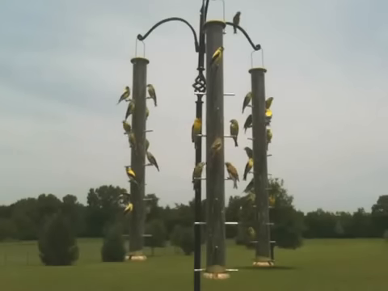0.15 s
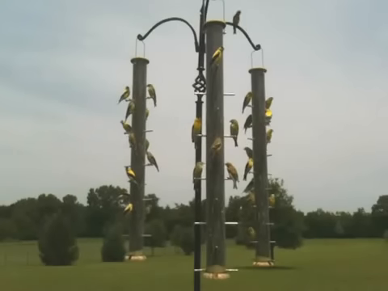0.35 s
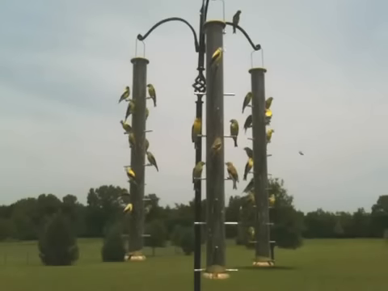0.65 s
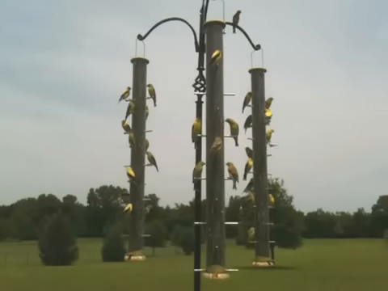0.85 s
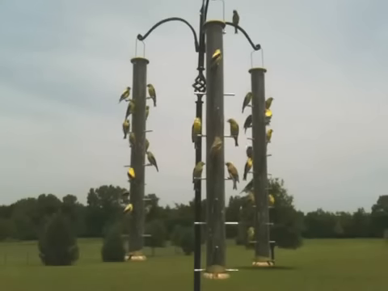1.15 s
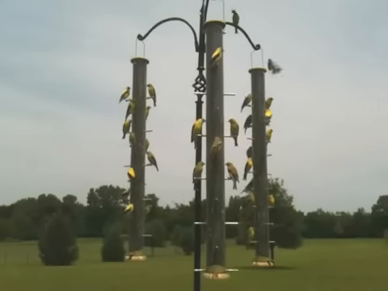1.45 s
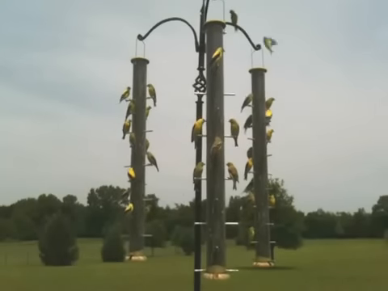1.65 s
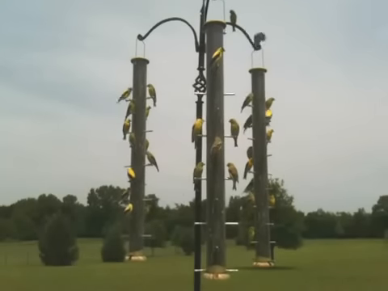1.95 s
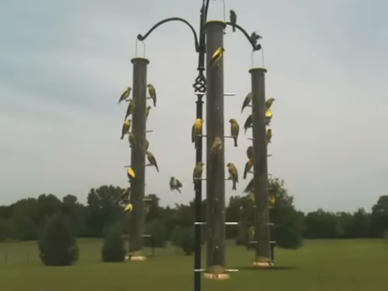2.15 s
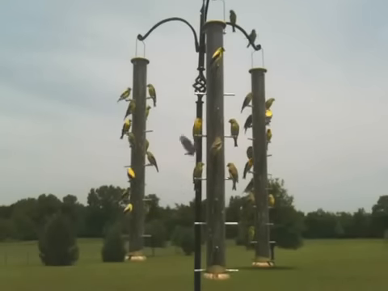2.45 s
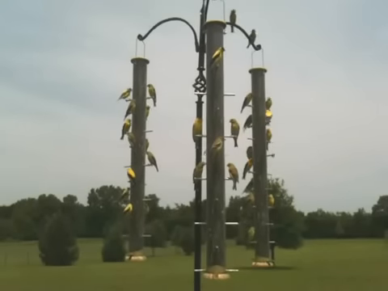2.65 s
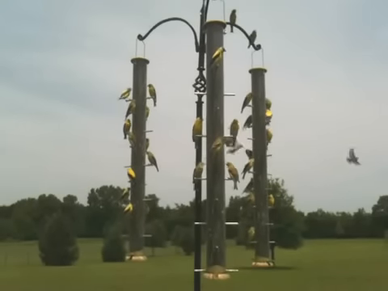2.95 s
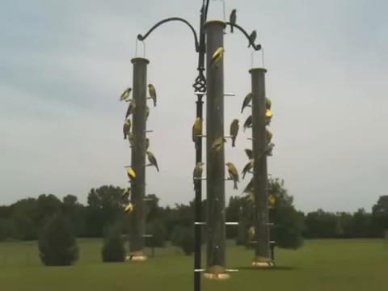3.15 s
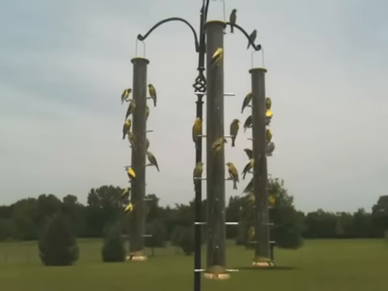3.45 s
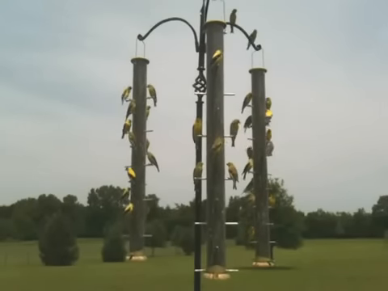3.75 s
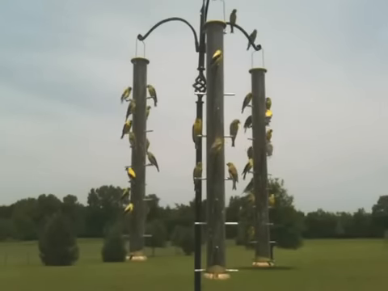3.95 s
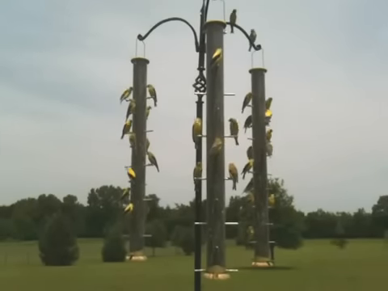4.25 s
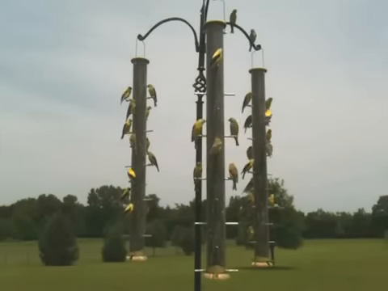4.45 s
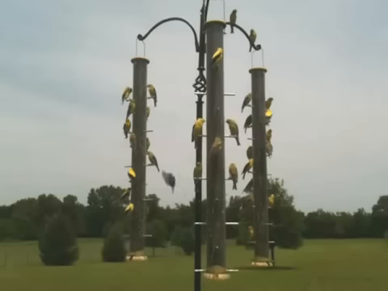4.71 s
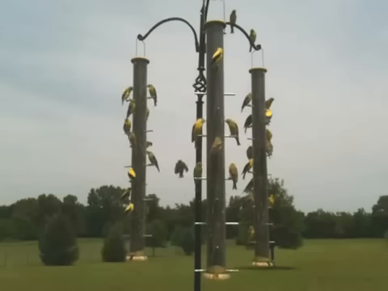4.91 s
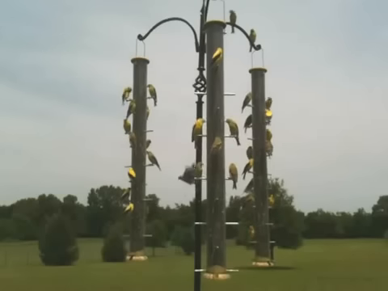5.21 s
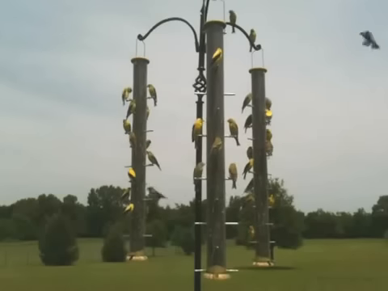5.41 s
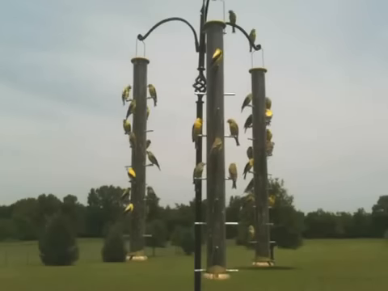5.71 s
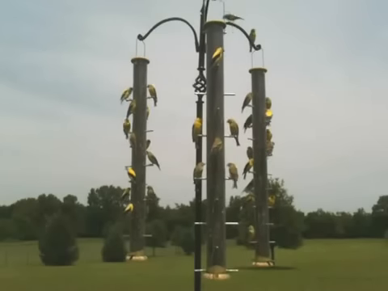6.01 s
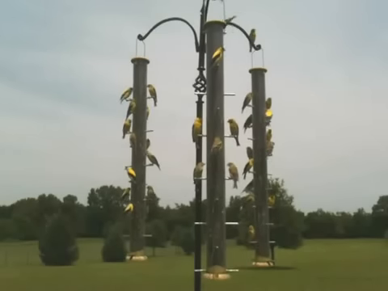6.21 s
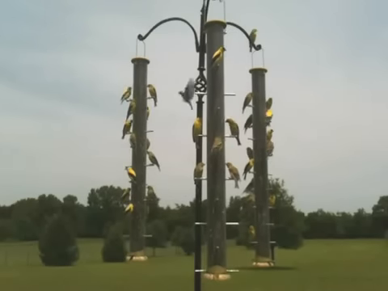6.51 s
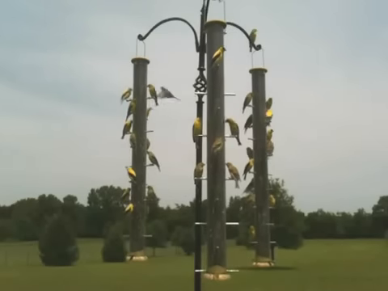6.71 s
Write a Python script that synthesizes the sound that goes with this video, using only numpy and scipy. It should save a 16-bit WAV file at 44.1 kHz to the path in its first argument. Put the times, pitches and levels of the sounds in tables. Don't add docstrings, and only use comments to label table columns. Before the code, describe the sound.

A continuous distant cicada chorus fills the background: a fine, hissy high buzz, strongest around 5 to 7 kHz, plus a softer drone near 1.1 kHz, barely swelling. Far below are faint traffic and air rumble and machine hum. At 0 s a near finch gives a bright tenth-of-a-second whistle, two pitches at once, answered at 0.2 s by a similar upward-bending one. Tiny distant chirps and glides follow from 0.4 to 2 s. From 2.0 to 2.4 s come four spaced falling notes, fading. A longer two-voiced whistle sounds at 2.95 s. After sparse faint twitter, quick falling chirps crowd together from 4.05 to 4.45 s, the last sharpest. Another descending phrase runs 5.4 to 5.8 s amid far twitter. A final double whistle comes at 6.2 s, then faint peeps to nearly 7 s. Dry open yard, slight scattered echo, grainy mono camera sound.

```python
import sys
import numpy as np
from scipy import signal
from scipy.fft import rfft, irfft
from scipy.io import wavfile
from scipy.ndimage import uniform_filter1d

SR = 44100
rng = np.random.default_rng(int(sys.argv[2]) if len(sys.argv) > 2 else 0)


def wav_record(signal):
    frames = np.transpose(np.atleast_2d(signal))
    bounded = np.clip(frames, -1, 1)
    quanta = np.round(bounded * 32767).astype(np.int16)
    wavfile.write(sys.argv[1], SR, quanta)


def linear_from_db(decibels):
    return 10 ** (np.asarray(decibels, float) / 20)


N = 302963

# pitch_hz, width_hz, level_db
HUM_TONES = [(218.7, 9.3, -67), (121.6, 8.7, -78)]
# pitch_hz, level_db
RUMBLE_COLOUR = [(15, -66), (25, -28), (54, -25), (107, -7.5), (193, 0.5), (211, -7), (227, 3), (245, -6),
                 (327, -5), (436, -13), (500, -13), (650, -44), (1100, -120)]
# start_s, level_db
GUSTS = [(0.0, -61), (0.19, -63.5), (2.91, -63.5), (3.16, -62.5), (4.04, -62), (5.19, -58.5), (6.31, -62.5),
         (6.72, -58), (6.87, -63)]
DEEP_DB, DEEP_LULL_S, DEEP_DB_PER_S, DEEP_PATCHY_DB = -80, 4.4, 1.8, 3.5

# start_s, level_db
CHORUS_SWELL = [(0.0, -47.5), (0.73, -49), (3.19, -47.5), (3.42, -48), (3.94, -48), (5.09, -47),
                (5.26, -48.5), (5.76, -48), (6.08, -49), (6.52, -48), (6.87, -48.5)]
# pitch_hz, density_db_per_hz
BUZZ_COLOUR = [(1500, -38), (2000, -30), (2600, -24.5), (3350, -19.5), (3750, -9.5), (4200, -7), (4900, -7),
               (5550, 1), (6800, -0.5), (7500, -6), (8500, -11.5), (9500, -18), (10300, -21.5),
               (11200, -26)]
# pitch_hz, density_db_per_hz
DRONE_COLOUR = [(250, -35.5), (420, -20.5), (511, -17.5), (609, -16.5), (890, -13.5), (1020, -7),
                (1120, 1.5), (1160, -1), (1240, -11), (1440, -23), (1870, -33), (2400, -41), (3120, -37.5),
                (5280, -120)]
DRONE_DB, SPLIT_HZ = -54, 6400
HIGH_SWELL, HIGH_CLIMB_DB_PER_S = 1, 0.24

# start_s, length_s, top_hz, level_db
FAR_ARCHES = [(1.43, .034, 2700, -71), (1.675, .044, 2650, -69), (1.85, .04, 3300, -74),
              (1.95, .04, 3300, -71), (2.04, .063, 3320, -67), (5.01, .05, 3480, -68),
              (5.19, .05, 2810, -72.5), (5.29, .053, 2680, -68), (5.565, .035, 2630, -67),
              (5.605, .049, 2700, -68), (5.795, .06, 2640, -69.5), (5.83, .095, 3500, -64.5),
              (5.86, .046, 2600, -66), (6.045, .066, 2620, -70), (6.11, .035, 2760, -64.5)]
ARCH_RISE_HZ, ARCH_FALL_HZ = 135, 264
# start_s, length_s, start_hz, end_hz, level_db
FAR_GLIDES = [(0.403, 0.13, 4500, 3670, -60.5), (0.59, 0.051, 2450, 3000, -72),
              (1.183, .029, 3600, 2830, -73), (1.29, .045, 3400, 2850, -66), (1.37, 0.038, 4620, 4060, -62),
              (1.458, 0.025, 3430, 2150, -66), (1.476, .034, 3100, 2510, -73),
              (1.617, 0.068, 4210, 4500, -61.5), (1.95, .023, 2670, 2400, -69),
              (3.48, 0.04, 2800, 3570, -70), (3.59, 0.028, 3170, 2750, -71),
              (3.925, 0.038, 4020, 4450, -61), (4.335, .02, 4600, 4300, -65),
              (4.62, 0.025, 5000, 4400, -64), (4.72, .059, 2860, 3070, -68), (4.948, .04, 3040, 2750, -70),
              (5.364, 0.023, 2500, 3280, -70), (5.455, 0.052, 4470, 4220, -57.5),
              (5.674, 0.019, 2090, 2080, -73), (5.965, 0.013, 3220, 2880, -67),
              (6.152, .03, 3900, 3870, -64), (6.283, 0.18, 3470, 3130, -68),
              (6.624, 0.032, 3390, 2950, -74), (6.773, 0.018, 3360, 2880, -71)]

# start_s, length_s, start_hz, end_hz, level_db
FALLING_PHRASES = [
    [(2.012, 0.042, 3540, 2560, -56), (2.143, 0.053, 4500, 2210, -56), (2.266, 0.039, 3850, 1980, -60),
     (2.401, 0.038, 3460, 2175, -61), (4.058, 0.03, 3330, 2710, -59)],
    [(4.18, 0.052, 4500, 2240, -55), (4.302, 0.05, 4100, 2090, -56.5), (4.32, 0.028, 4870, 3370, -51),
     (4.385, 0.031, 3570, 2980, -67), (4.422, 0.046, 4300, 2400, -53.5), (4.443, 0.021, 4960, 3430, -45)],
    [(5.395, 0.035, 3440, 2710, -57), (5.522, 0.046, 4340, 2125, -55.5), (5.638, 0.043, 3780, 2076, -59.5),
     (5.657, 0.021, 4360, 3470, -51.5), (5.765, 0.042, 3830, 2300, -59)],
]
FALL_SAG = 0.053
BIRD_FACING = [-64, -59, -55]
FALL_OVERTONES = [-5, 0, -3]

# start_s, low_voice_hz, high_voice_hz, effort_db
WHISTLES = [
    [(0, 2890, 4120, -46), (0.015, 3140, 4400, -51.5), (0.035, 3180, 4650, -45), (0.075, 3073, 4830, -47),
     (0.098, 3000, 4840, -49), (0.11, 2720, 4720, -60)],
    [(0.224, 2130, 3420, -55), (0.24, 2636, 3890, -46.5), (0.278, 3147, 4680, -45.5),
     (0.298, 3190, 4730, -46), (0.325, 3170, 4660, -50), (0.352, 3170, 4520, -59)],
    [(2.946, 1900, 2960, -59), (2.96, 2554, 3413, -51.5), (2.975, 2780, 3880, -47.5),
     (2.995, 2857, 4220, -43), (3.032, 2830, 4280, -46), (3.065, 2780, 4430, -43.5),
     (3.09, 2686, 4350, -47.5), (3.107, 2650, 4260, -51)],
    [(6.21, 2160, 3390, -55), (6.225, 2700, 3850, -47.5), (6.262, 2980, 4170, -43), (6.29, 2950, 4180, -47),
     (6.306, 2860, 4060, -46.5), (6.32, 2890, 4350, -47), (6.345, 2750, 4300, -51),
     (6.368, 2680, 4280, -57)],
]
MIX_TONES = [(2, 0), (1, 1), (3, 0), (0, 2), (2, 1), (3, -1), (4, -2), (-1, 2)]
MIX_PEAKS = [(-62, -60, -46, -55), (-57, -52, -54, -58), (-46, -53, -50, -66), (-51, -53, -58, -64),
             (-59, -61, -66, -72), (-72, -72, -54, -64), (-76, -76, -70, -72), (-70, -64, -60, -70)]
# pitch_hz, gain_db
AIRWAY = [(2000, -2), (2700, -14), (3200, -2), (3500, -7), (4400, 0.5), (4850, -7.5)]
# pitch_hz, gain_db
BEAK_GAIN = [(4500, -13), (6500, -5), (8300, 5), (9900, -3.5), (11000, 2)]

# pitch_hz, gain_db
MIC_TREBLE = [(9000, 0), (10000, -2), (11200, -3)]
# pitch_hz, step_db
ROUNDING_STEP = [(100, -75), (1000, -60), (1500, -56), (2200, -55.3), (3400, -46.6), (4000, -50), (6000, -47),
                 (9000, -46), (10200, -47), (11000, -52)]
HOP, GRID, BINS = 1152, 804, 582


def level(x, db):
    return x * linear_from_db(db) / np.sqrt(np.mean(x ** 2))


def colour(x, table):
    hz, db = np.transpose(table)
    axis = np.maximum(np.fft.rfftfreq(len(x), 1 / SR), 1)
    gain = linear_from_db(np.interp(np.log(axis), np.log(hz), db))
    return irfft(rfft(x) * gain, len(x))


def band(x, low_hz, high_hz):
    return signal.sosfilt(signal.butter(2, [low_hz, high_hz], "band", fs=SR, output="sos"), x)


def walk(rate, size=N):
    hold = int(SR / rate)
    steps = np.repeat(rng.standard_normal(size // hold + 1), hold)
    return 1.5 * uniform_filter1d(uniform_filter1d(steps, hold), hold)[:size]


def add(out, start_s, x):
    i = int(start_s * SR)
    out[i:i + len(x)] += x[:N - i]


def soft_edges(size, rise_s, fall_s):
    t = np.arange(size) / SR
    rise = np.clip(t / rise_s, 0, 1)
    fall = np.clip(t[::-1] / fall_s, 0, 1)
    return np.sin(np.pi / 2 * rise * fall) ** 2


def hum():
    out = 0
    for hz, width, db in HUM_TONES:
        tone = band(rng.standard_normal(N), hz - width / 2, hz + width / 2)
        out = out + level(tone, db)
    return out


def rumble():
    t = np.arange(N) / SR
    x = colour(rng.standard_normal(N), RUMBLE_COLOUR)
    deep = colour(x, [(125, 0), (145, -60)])
    deep_db = DEEP_DB + DEEP_DB_PER_S * np.abs(t - DEEP_LULL_S) + DEEP_PATCHY_DB * walk(4)
    gust_db = np.interp(t, *np.transpose(GUSTS))
    return level(deep, -0.17) * linear_from_db(deep_db) + level(x - deep, -0.48) * linear_from_db(gust_db)


def clicks(rate, scatter_db):
    moment, sign, size = rng.random((3, N))
    return (moment < rate / SR) * np.sign(sign - .5) * linear_from_db(scatter_db * size)


def cicadas():
    t = np.arange(N) / SR
    low_db = np.interp(t, *np.transpose(CHORUS_SWELL))
    mean_db = low_db.mean()
    high_db = mean_db + HIGH_SWELL * (low_db - mean_db) + HIGH_CLIMB_DB_PER_S * (t - t.mean())
    buzz = colour(clicks(16000, 6), BUZZ_COLOUR)
    buzz = buzz * linear_from_db(0.16) / np.std(band(buzz, 4630, SPLIT_HZ))
    out = 0
    bounds = np.geomspace(1500, 11600, 10)
    spectrum, axis = rfft(buzz), np.fft.rfftfreq(N, 1 / SR)
    for low_hz, high_hz in zip(bounds, bounds[1:]):
        part = irfft(spectrum * ((axis >= low_hz) & (axis < high_hz)), N)
        swell_db = low_db if low_hz < SPLIT_HZ else high_db
        out = out + linear_from_db(swell_db + .5 * walk(9)) * part
    drone = level(colour(clicks(4000, 6), DRONE_COLOUR), DRONE_DB + .99)
    return out + drone * linear_from_db(0.32 * walk(4))


def yard(x, t60_s, wet_db):
    t = np.arange(int(.3 * SR)) / SR
    tail = rng.standard_normal(len(t)) * np.exp(-np.log(1000) * t / t60_s) * (t > .003)
    tail = tail / np.sqrt(np.sum(tail ** 2))
    return x + linear_from_db(wet_db) * signal.fftconvolve(x, tail)[:N]


def notes(rows, overtones_db, tilt_db, rough_db):
    out = np.zeros(N)
    for (start_s, length_s, *pitch_hz, db), over_db in zip(rows, overtones_db):
        u = np.arange(int(length_s * SR)) / (length_s * SR)
        size = len(u)
        hz = np.polyval(np.polyfit([0, .5, 1], pitch_hz, 2), u)
        phase = 2 * np.pi * np.cumsum(hz * (1 + .004 * walk(200, size))) / SR
        voice = linear_from_db(tilt_db * np.log2(hz / hz.mean())) * np.sin(phase)
        for k, k_db in enumerate(over_db, start=2):
            beak_db = np.interp(k * hz, *np.transpose(BEAK_GAIN))
            voice += linear_from_db(k_db + beak_db + 2.5 * walk(150, size)) * np.sin(k * phase)
        breath = 1.6 * linear_from_db(db + rough_db * walk(120, size))
        add(out, start_s, breath * voice * soft_edges(size, 0.0042, 0.0085))
    return out


def flock(count, db):
    when, length, pitch, fall, loud = rng.random((count, 5)).T
    start_s, length_s = when * (N / SR - .1), .025 + .05 * length
    hz = 2500 + 900 * pitch ** 2
    return np.transpose([start_s, length_s, hz, hz + 120 - 300 * fall, hz - 600 * fall, db + 6 * loud])


def twitter():
    rows = []
    for start_s, length_s, top, db in FAR_ARCHES:
        rows.append((start_s, length_s, top - ARCH_RISE_HZ, top, top - ARCH_FALL_HZ, db))
    for start_s, length_s, start, end, db in FAR_GLIDES:
        rows.append((start_s, length_s, start, (start + end) / 2, end, db))
    rows += list(flock(count=80, db=-81))
    return notes(rows, [()] * len(rows), tilt_db=3, rough_db=2)


def falling_notes():
    out = 0
    for rows, facing_db in zip(FALLING_PHRASES, BIRD_FACING):
        start_s, length_s, start, end, db = np.transpose(rows)
        middle = (start + end) / 2 - FALL_SAG * (start - end)
        glides = np.transpose([start_s, length_s, start, middle, end, db])
        overtones_db = (facing_db - db)[:, None] + FALL_OVERTONES
        out = out + notes(glides, overtones_db, tilt_db=15, rough_db=1.6)
    return out


def whistles():
    out = np.zeros(N)
    for rows, mix_db in zip(WHISTLES, np.transpose(MIX_PEAKS)):
        s, *columns = np.transpose(rows)
        t = np.arange(s[0], s[-1], 1 / SR)
        size = len(t)
        low_hz, high_hz, db = (uniform_filter1d(np.interp(t, s, c), 250, mode="nearest") for c in columns)
        phases, call = [], 0
        for hz in (low_hz, high_hz):
            phase = 2 * np.pi * np.cumsum(hz * (1 + .001 * walk(150, size))) / SR
            voice_db = db + np.interp(hz, *np.transpose(AIRWAY)) + 0.43 * walk(70, size)
            call = call + linear_from_db(voice_db) * np.sin(phase)
            phases.append(phase)
        low, high = phases
        for (m, n), peak_db in zip(MIX_TONES, mix_db):
            effort_db = 0.52 * (abs(m) + abs(n)) * (db - db.max())
            beak_db = 0.32 * np.interp(m * low_hz + n * high_hz, *np.transpose(BEAK_GAIN))
            call += linear_from_db(peak_db + effort_db + beak_db) * np.sin(m * low + n * high)
        add(out, s[0], np.sqrt(2) * call * soft_edges(size, 0.0038, 0.004))
    return out


def scene():
    near = yard(whistles() + falling_notes(), t60_s=.12, wet_db=-15)
    far = yard(twitter(), t60_s=.15, wet_db=-8)
    return (colour(near + far, MIC_TREBLE) + cicadas() + rumble() + hum())[None]


def coarse_rounding(x, follow):
    n = np.arange(2 * HOP) + .5
    window = np.sin(np.pi * n / 2 / HOP) * np.sqrt(2 / HOP)
    basis = np.cos(np.pi / HOP * np.outer(n + HOP / 2, np.arange(BINS) + .5)) * window[:, None]
    lead = 2 * HOP - GRID
    blocks = np.pad(x, (lead, 3 * HOP - (N + lead) % HOP)).reshape(-1, HOP)
    bins = np.hstack([blocks[:-1], blocks[1:]]) @ basis
    hz, db = np.transpose(ROUNDING_STEP)
    bin_hz = np.arange(BINS) / HOP * SR / 2
    step = linear_from_db(np.interp(np.log(bin_hz + 1), np.log(hz), db))
    busy = np.mean(np.log(1 + np.abs(bins) / step), axis=1, keepdims=True)
    scale_db = 1.8 * rng.standard_normal((len(bins), BINS // 10 + 1))
    scale_db = np.repeat(scale_db, 10, axis=1)[:, :BINS]
    step = step * linear_from_db(follow * (busy - np.median(busy)) + scale_db)
    rounded = np.floor((np.abs(bins) / step) ** .75 + .41) ** (4 / 3)
    frames = np.sign(bins) * rounded * step @ basis.T
    blocks[:-1] = frames[:, :HOP]
    blocks[1:-1] += frames[:-1, HOP:]
    return blocks.ravel()[lead:lead + N]


def top_cut(x):
    return signal.sosfilt(signal.butter(12, 11140, fs=SR, output="sos"), x)


def record(dry):
    mix = coarse_rounding(dry[0], follow=20)[None]
    return top_cut(mix)


dry = scene()
out = record(dry)
wav_record(out)
```